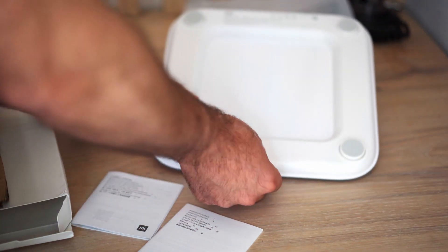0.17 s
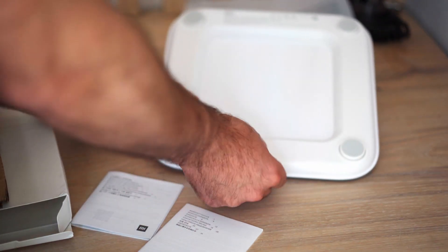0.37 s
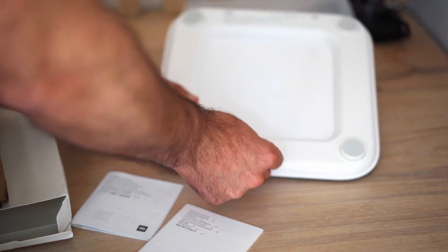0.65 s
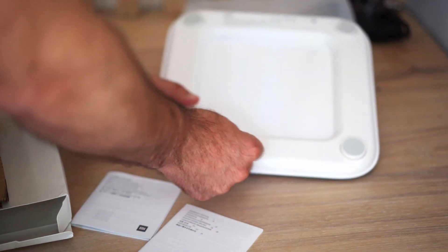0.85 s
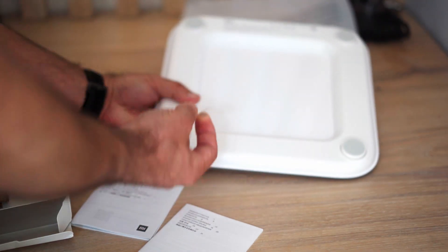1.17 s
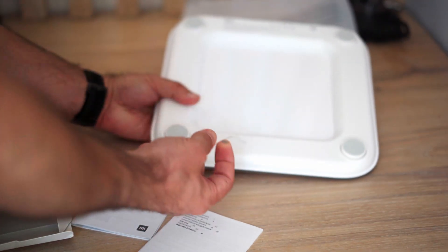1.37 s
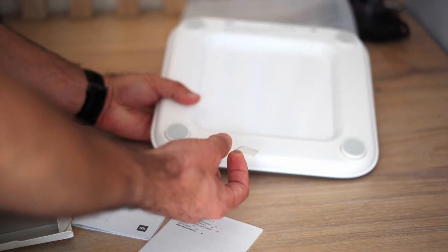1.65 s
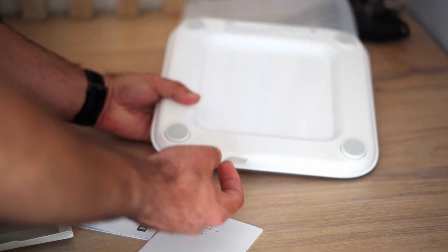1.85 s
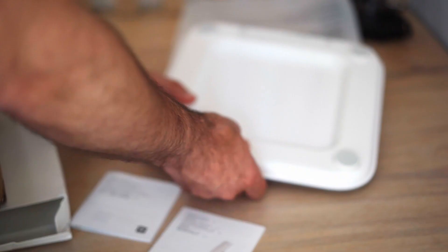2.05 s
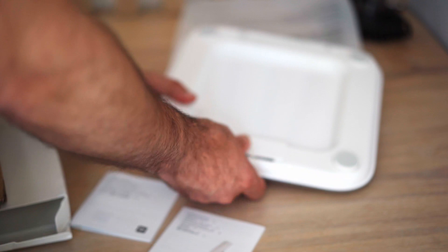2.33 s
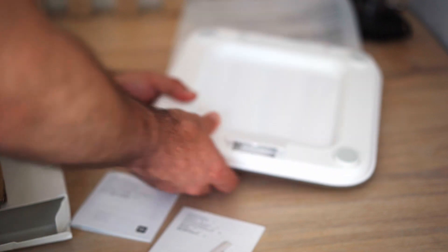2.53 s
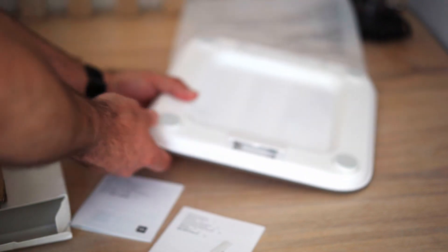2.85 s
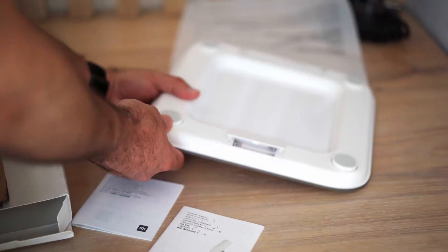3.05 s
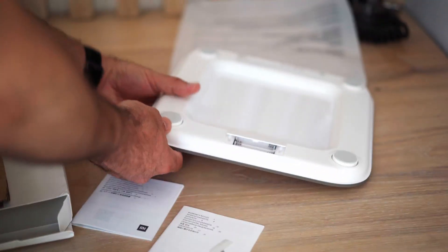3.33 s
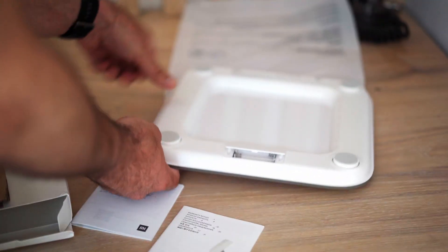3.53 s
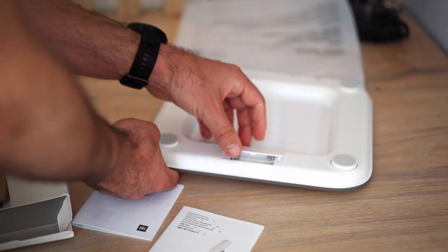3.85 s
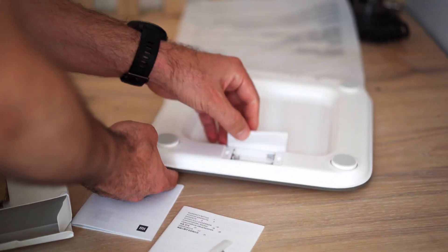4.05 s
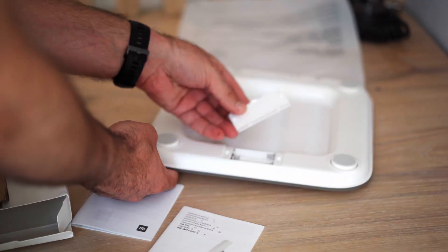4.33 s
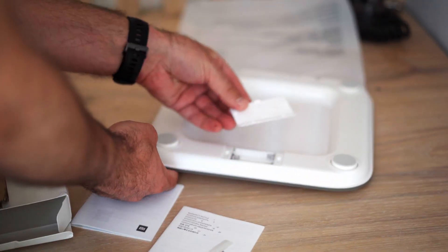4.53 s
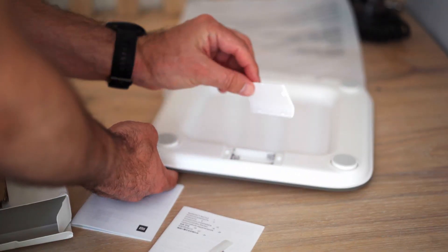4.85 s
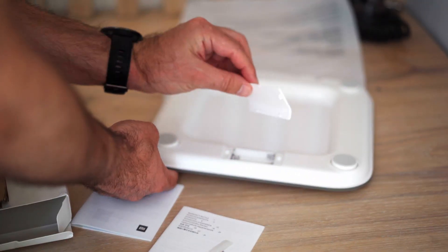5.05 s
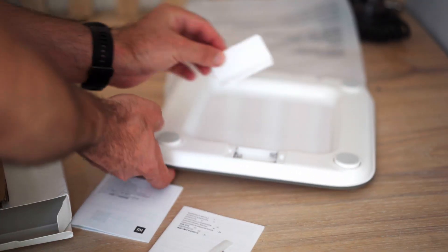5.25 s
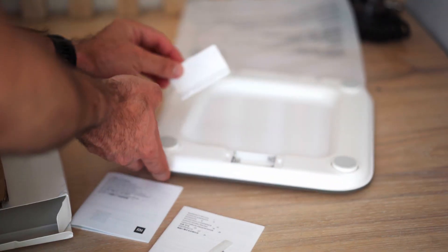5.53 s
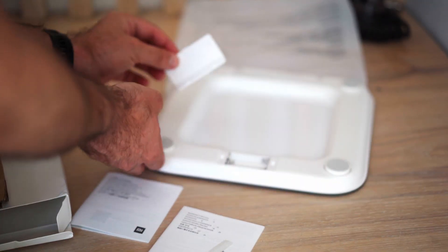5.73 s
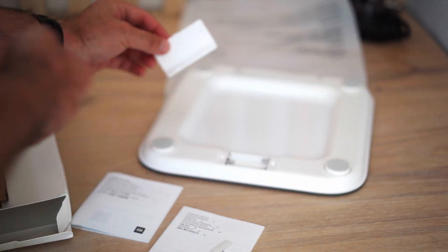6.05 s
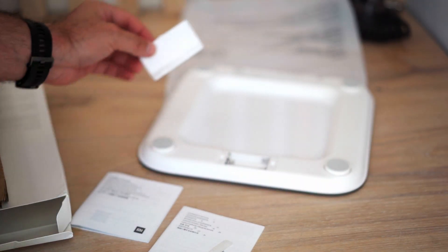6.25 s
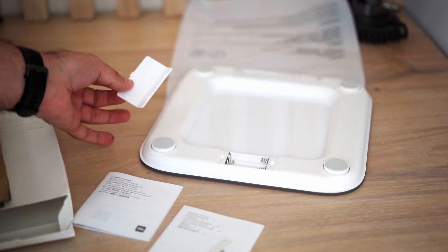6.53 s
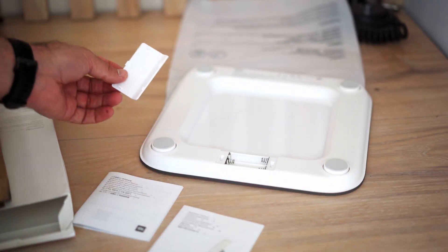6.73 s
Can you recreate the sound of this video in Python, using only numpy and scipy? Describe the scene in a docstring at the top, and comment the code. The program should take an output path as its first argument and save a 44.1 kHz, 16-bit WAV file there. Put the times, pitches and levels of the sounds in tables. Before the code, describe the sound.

Soft skin friction and tiny ticks on a plastic shell open the scene, over steady room noise. A small lid pops loose with a crisp snap and clatters lightly. Two clusters of hollow knocks with woody thumps follow, then rubbing, finger ticks and a light lid click. After a near-silent pause, the shell is put down sharply, and faint sliding ends it. Close microphone, short live room echo.

```python
"""Hands at work on a bathroom scale

Hands work on an upturned plastic bathroom scale on a wooden table, close to a camera in a bare room.
The battery lid snaps open and rattles on the wood; the scale knocks the table and ticks under the fingers,
the lid is picked up and the scale set down. Each contact is a burst of tiny impacts ringing resonances.
Skin slides on plastic as shaped noise with one soft squeak; the room is steady noise with a faint hum."""
import sys
import numpy as np
from scipy import signal
from scipy.fft import rfft, irfft, next_fast_len
from scipy.io import wavfile
from scipy.ndimage import uniform_filter1d

SR = 44100
rng = np.random.default_rng(int(sys.argv[2]) if len(sys.argv) > 2 else 0)


def waveform_to_disk(signal):
    """Save audio, clipped to [-1, 1], as 16-bit WAV at the path in sys.argv[1]."""
    frames = np.transpose(np.atleast_2d(signal))
    scaled = np.clip(frames, -1, 1) * 32767
    samples = np.round(scaled).astype(np.int16)
    wavfile.write(sys.argv[1], SR, samples)


N = 303849
SPAN = 2 ** 15  # samples for one contact and its echo
HZ = np.fft.rfftfreq(SPAN, 1 / SR)
T = np.arange(SPAN) / SR

# how wide the room's echo and the sliding skin sound: f/Hz, side minus mid level/dB
ROOM_WIDTH = [(30, -50), (110, -40.5), (200, -26.5), (400, -17.5), (700, -7), (1300, -4.5), (2400, 0.5),
              (8000, -0.5)]


def amp(db):
    """Turn decibels into a plain gain."""
    return 10 ** (np.asarray(db) / 20)


def unit(x):
    """Scale a signal to an average (rms) strength of 1."""
    return x / np.sqrt(np.mean(x ** 2) + 1e-20)


def along(points, hz):
    """Read a table of (frequency, value) points, joined by lines on a log frequency axis."""
    f, v = np.transpose(points)
    return np.interp(np.log(hz + 1), np.log(f + 1), v)


def curve(rows, order):
    """Read one column of a time table at every sample."""
    rows = np.array(rows)
    return np.interp(np.arange(N) / SR, rows[:, 0], rows[:, order])


def filtered(x, response):
    """Multiply the spectrum of x by a response that depends on frequency."""
    m = next_fast_len(N + SR // 2)
    spectrum = rfft(x, m) * response(np.fft.rfftfreq(m, 1 / SR))
    return irfft(spectrum, m)[..., :N]


def spread(side_table, hz):
    """Gains for mid and side: sound from all around differs more between two close ports as side grows."""
    return np.array([np.ones_like(hz), amp(along(side_table, hz))])


def left_right(mid, side):
    """Turn mid and side into a left and a right channel."""
    return np.array([mid + side, mid - side])


def wide(colour, side_table, patchy_db):
    """Stereo noise of rms 1 whose strength varies in random patches of time and frequency."""
    z = signal.stft(rng.standard_normal((2, N)), nperseg=512)[2]
    field = rng.standard_normal(z.shape[1:])
    field = uniform_filter1d(field, size=6, axis=0)  # smooth over frequency
    field = uniform_filter1d(field, size=10, axis=1)  # smooth over time
    pair = signal.istft(z * amp(patchy_db * unit(field)), nperseg=512)[1][:, :N]
    mid, side = filtered(pair, lambda hz: colour(hz) * spread(side_table, hz))
    return unit(left_right(mid, side))


def air():
    """Room tone is coloured noise that drifts slowly; a steady and a wavering low tone make the hum."""
    # the low hum: f/Hz, width of its wavering part/Hz, level/dB before the two-part mix below
    hum_hz, width_hz, hum_db = (84, 5, -73)
    # colour of room tone and microphone hiss: f/Hz, relative level/dB
    tone_colour = [(12, -52.5), (20, -19), (53, -4.5), (84, -5.5), (114, -11.5), (160, -5), (351, -10),
                   (428, -13), (535, -13), (839, -13.5), (1080, -17.5), (1690, -21), (3140, -26.5),
                   (14300, -34), (16500, -43.5)]
    # slow drift of the room tone: t/s, level/dB
    tone_drift = [(0, -62.5), (.5, -64.5), (1.5, -65), (4.8, -64.5), (5.4, -63.5), (6.89, -64.5)]
    # how wide the room tone sounds: f/Hz, side minus mid level/dB
    tone_width = [(30, -43), (110, -21.5), (200, -15), (400, -8), (800, -4.5), (2000, 0), (8000, 0)]
    waver = unit(filtered(rng.standard_normal(N), lambda hz: 1 / (1 + (2 * (hz - hum_hz) / width_hz) ** 2)))
    steady = np.sin(2 * np.pi * hum_hz * np.arange(N) / SR)
    hum = 1.2 * steady + .35 * waver
    tone = wide(lambda hz: amp(along(tone_colour, hz)), tone_width, patchy_db=1.5)
    return amp(curve(tone_drift, order=1)) * tone + amp(hum_db) * hum


def skin():
    """Each slide swells, holds and fades; skin drags on middle tones, hisses above and once squeaks softly."""
    # skin sliding on plastic: start t/s, fastest t/s, end t/s, drag level/dB, hiss level/dB
    slides = [(0.125, 0.148, 0.2, -65.5, -88), (.25, 0.496, 0.94, -74.5, -76.5),
              (0.62, 0.687, 0.84, -66, -68.5), (0.789, 0.912, 0.98, -62, -61),
              (0.95, 0.988, 1.12, -68, -57.5), (1.05, 1.24, 1.43, -77, -73),
              (1.908, 2.054, 2.094, -89, -69), (3.319, 3.457, 3.88, -58, -65.5),
              (5.006, 5.232, 5.67, -68.5, -79), (5.556, 5.7, 5.78, -61, -63),
              (5.793, 6.3, 6.78, -65, -64.5), (6.72, 6.805, 7.1, -65, -73)]
    # colour of the drag on the shell: f/Hz, relative level/dB
    drag_colour = [(150, -82), (500, -5), (1200, 0.5), (2500, -4.5), (5000, -9.5), (9000, -31)]
    # colour of the hiss: f/Hz, relative level/dB
    hiss_colour = [(1470, -37), (2500, -2), (7260, 5), (14400, 0), (16000, 3), (16500, -22.5)]
    # a dragging fingertip: t/s, squeak f/Hz, gain on the wavering tone/dB
    squeak_path = [(.64, 1400, -80), (.68, 1250, -54.5), (.74, 1080, -57.5), (.82, 950, -67),
                   (.86, 900, -86)]
    press, curl = 1.27, 1.03  # how soon a slide reaches full pressure; how much its edges taper

    drag = wide(lambda hz: amp(along(drag_colour, hz)), ROOM_WIDTH, patchy_db=3)
    hiss = wide(lambda hz: amp(along(hiss_colour, hz)), ROOM_WIDTH, patchy_db=2.5)
    # slow noise makes the squeak waver
    flutter = wide(lambda hz: 1 / (1 + (hz / 180) ** 2), [(100, -6.5)], patchy_db=2.5)
    squeak = flutter * np.sin(2 * np.pi * np.cumsum(curve(squeak_path, order=1)) / SR)

    start, peak, end, drag_db, hiss_db = np.transpose(slides)
    t = np.arange(0, N + 64, 64)[:, None] / SR  # one step every 64 samples
    swell = (t - start) / (peak - start)
    fade = (end - t) / (end - peak)
    stroke = np.clip(press * np.minimum(swell, fade), 0, 1) ** curl
    drag_gain = np.interp(np.arange(N) / SR, t[:, 0], stroke @ amp(drag_db))
    hiss_gain = np.interp(np.arange(N) / SR, t[:, 0], stroke @ amp(hiss_db))
    rub = drag_gain * drag + hiss_gain * hiss
    rub = rub * amp([[-1.5], [1.5]])  # a little to the right
    return rub + amp(curve(squeak_path, order=2)) * squeak


def modes(table):
    """Response of a set of damped resonances, each ringing at its own pitch after it is struck."""
    total = 0
    for k, (centre, width, db) in enumerate(table):
        ring = 1j * HZ * width / (centre * centre - HZ * HZ + 1j * HZ * width)
        total = total + (-1) ** k * amp(db) * ring
    return total


def detuned(table, pitch_spread, level_spread_db=0):
    """Shift each resonance a little at random, in pitch and in level."""
    return [(hz * rng.normal(1, pitch_spread), width, db + rng.normal(0, level_spread_db))
            for hz, width, db in table]


def above(hz):
    """A small plate radiates little bass."""
    return (1j * HZ / (hz + 1j * HZ)) ** 2


def hard(db_octave, corner_hz, steep):
    """A longer contact passes less treble; a harder one tilts the spectrum up."""
    return (1 + 1j * HZ / 500) ** (db_octave / 6) / (1 + 1j * HZ / corner_hz) ** steep


def room():
    """A fresh stereo echo tail: a gap until the first wall, then each frequency dies at its own speed."""
    # echo times: f/Hz, time to fall by 60 dB/s
    echo_time = [(60, 0.85), (300, 0.57), (850, 0.75), (2600, 0.6), (8000, 0.56), (16000, 0.34)]
    hz, t, z = signal.stft(rng.standard_normal((2, SPAN)), SR, nperseg=256)
    dying = z * amp(-60 * t / along(echo_time, hz)[:, None])
    tail = signal.istft(dying, SR, nperseg=256)[1][:, :SPAN]
    tail = tail * (1 - np.exp(-(T / 0.0013) ** 2)) * (T < .6)
    spectrum = rfft(tail / np.linalg.norm(tail[0])) * spread(ROOM_WIDTH, HZ)
    mid, side = spectrum / (1 + 1j * HZ / 10000)  # soft things swallow treble
    return left_right(mid, side)


def add(out, s, db, pan_db, chatter, body, wet_db, blow, push=0):
    """One contact: a first blow and a dying volley of tiny impacts ring the body; one soft push moves the table."""
    t = T[:SPAN // 4]
    impacts = rng.standard_normal(SPAN // 4) * amp(3.9 * rng.standard_normal(SPAN // 4))
    rise = 1 - np.exp(-t / min(.0008, chatter / 4))
    volley = impacts * np.exp(-t / chatter) * rise
    volley[0] = blow * np.linalg.norm(volley)
    strength = np.linalg.norm(volley)

    whole = strength * (body + push)  # the walls blur the volley into one blow
    gain = amp(db) / np.sqrt(np.sum(irfft(whole) ** 2) / (chatter * SR + 60))
    sound = rfft(volley, SPAN) * body + strength * push

    shadow = HZ ** 2 / (HZ ** 2 + 700 ** 2)  # the camera body shades only short waves
    lead = np.exp(2j * np.pi * HZ * 3e-6 * pan_db * np.array([[.5], [-.5]]))  # the nearer port hears first
    direct = sound * amp(np.outer([.5, -.5], pan_db * shadow)) * lead
    late = np.exp(-2j * np.pi * HZ * .7 * chatter)  # delays the echo to within the volley
    echo = amp(wet_db) * whole * late * room()

    start = round(s * SR)
    piece = out[:, start:start + SPAN]
    piece += gain * irfft(direct + echo)[:, :piece.shape[1]]


def ticks():
    """Nail and plastic ticks: short volleys through one broad, quickly damped resonance."""
    # each tick: t/s, level/dB before stereo and echo, chatter fading time/s, centre f/Hz
    tick_list = [(.141, -67, 0.01, 3500), (0.907, -52.5, 0.0017, 9100), (.935, -51.5, .0018, 19000),
                 (.970, -59, 0.0088, 21000), (.978, -44, 0.017, 20000), (1.005, -51.5, .004, 1500),
                 (1.008, -54.5, .003, 7000), (2.864, -50.5, 0.026, 5300), (3.078, -43, .004, 7800),
                 (3.095, -38, 0.017, 2830), (3.393, -56.5, .004, 5760), (3.473, -56.5, 0.0012, 3507),
                 (3.504, -42, 0.0014, 7360), (3.510, -45, .0015, 7000), (3.519, -40, 0.0019, 2500),
                 (3.542, -50.5, 0.0029, 3000), (3.592, -48.5, 0.00076, 2800), (3.605, -50, 0.0012, 5440),
                 (3.672, -46.5, 0.0011, 2630), (3.695, -52.5, 0.0018, 2400), (3.868, -62.5, 0.0046, 1960),
                 (4.135, -61, .004, 1790), (4.867, -65.5, 0.00212, 1990), (5.19, -67, .004, 2470),
                 (5.548, -50.5, 0.0015, 2040), (5.596, -35, 0.00088, 2580), (5.644, -54, 0.0048, 2600),
                 (5.667, -61, .0022, 2200), (5.687, -50, .001, 3500), (5.700, -49, .001, 4000),
                 (5.723, -49, 0.011, 4860), (6.754, -65, 0.0042, 3000)]
    out = np.zeros((2, N))
    for s, db, chatter, hz in tick_list:
        body = modes([(hz, 1.7 * hz, 0)]) ** 2 * above(300)
        blow = 0.49 * np.exp(-chatter / 0.0065)  # a long scuff starts softly
        add(out, s, db, -6.5, chatter, body, wet_db=-5, blow=blow)  # hands a little to the right
    return out


def knocks():
    """The shell rings anew at each blow; the spot it lands on sets how much each table mode thumps."""
    # the scale knocks the table: t/s, level/dB before stereo and echo, left minus right/dB (treble),
    # chatter fading time/s, hardness tilt/dB per octave, relative table thump/dB, spot across the table (0-1)
    knock_list = [(.398, -60.5, -1.5, .012, -5.5, 2, 0.08), (2.886, -21.5, -5.5, 0.007, 0, 1.5, 0.26),
                  (2.930, -30.5, -3, .014, 1, 7.5, 0.32), (2.949, -34, -7, .011, -7, -4, 0.26),
                  (3.105, -20, -5, 0.01, -2, 1.5, 0.49), (3.122, -26, -1, 0.0067, -11, -9, 0.4),
                  (3.190, -29, -7, .01, 0, -10, 0.5), (3.205, -29, -3, 0.0091, -4, 16, 0.45),
                  (3.363, -43.5, 2, 0.011, 0, 15, .48), (3.528, -51.5, -1, 0.014, 2, 16.5, 0.16),
                  (5.737, -17.5, -7.5, .003, -2.5, -17.5, 0), (5.7426, -17.5, -7, 0.0019, -2, -25, 0),
                  (5.749, -27.5, 3, 0.0092, -2.5, 13, 0.46), (5.762, -28, 1, 0.00837, -7.5, 3, 0.28),
                  (5.780, -26.5, 1.5, .003, -7, -13, 0.29), (5.810, -31.5, -6.5, 0.005, -5, -8, 0.32)]
    # resonances of the wooden table: f/Hz, width/Hz, relative level/dB
    table_modes = [(69.4, 10, 0), (145.3, 26, 0), (378, 32.6, 2.5), (653, 51, -2)]
    # resonances of the plastic shell before random shifts: f/Hz, width/Hz, relative level/dB
    shell_modes = [(475, 72, -4), (744, 91.6, 3.5), (1036, 24, 3), (1264.4, 79, 9.5), (1530, 70, 0),
                   (1820, 142, 5), (2160, 600, -2), (2635, 280, 7.5), (3580, 97, -2.5), (3740, 770, -8.5)]
    out = np.zeros((2, N))
    for s, db, pan_db, chatter, hard_db, thump_db, spot in knock_list:
        ringing = modes(detuned(shell_modes, 0.02, 2.2))
        shell = ringing + amp(-2.0) * above(340)  # plus an unpitched part
        body = hard(hard_db, 3500, steep=2.61) * shell

        shape = np.abs(np.cos(np.pi * spot * np.arange(1, len(table_modes) + 1)))
        thump = 0
        for k, row in enumerate(table_modes):
            thump = thump + (-1) ** k * shape[k] * modes([row])
        push = amp(9.0 + thump_db) * thump * above(25) * hard(0, 1200, steep=1.7)
        add(out, s, db, pan_db, chatter, body, wet_db=-2.5, blow=0.42, push=push)
    return out


def lid():
    """The thin lid rings with other modes when seated, loose, slid or held, a little detuned each time."""
    # lid contacts: t/s, how the lid lies, level/dB before stereo and echo, left minus right/dB (treble),
    # chatter fading time/s, hardness tilt/dB per octave, first blow share (0-1)
    contacts = [(2.187, "seated", -15, -7, 0.0019, -2, 0.5), (2.192, "seated", -22, -8, 0.0039, -0.5, .3),
                (2.450, "loose", -33.5, -6.5, 0.0057, 0, 0.2),
                (2.458, "loose", -33.5, -7.5, 0.0062, 1, 0.1),
                (2.470, "loose", -34.5, -5.5, .011, 2.5, 0.3), (2.476, "loose", -42, -3, .005, 2, .3),
                (2.484, "loose", -39.5, -2.5, .0033, 1.5, .22), (3.949, "slid", -44, -5, .012, -2, 0.13),
                (3.957, "slid", -40, -12.5, .0052, -1, 0.17), (4.117, "held", -55, -9, 0.015, -3.5, .4),
                (4.145, "held", -29, -7, 0.0046, 1.8, 0.67), (4.199, "held", -48, -7, 0.0099, -4.5, 0.1),
                (4.208, "held", -44, -10.5, 0.0064, -2.5, 0.3)]
    # unpitched part for each way the lid lies: relative level/dB
    thud_db = {"seated": -12, "loose": -18, "slid": -13, "held": -15}
    # lid resonances before random shifts, for each way it lies: f/Hz, width/Hz, relative level/dB
    lid_modes = {
        "seated": [(397, 50, -10), (613, 110, 1.5), (1212, 160, -1), (1902, 210, 5), (2690, 320, -21.5),
                   (4200, 600, -31.5), (6880, 530, -18.5), (9700, 820, -3.5), (14800, 2700, -15.5)],
        "loose": [(1237, 210, 0), (2100, 146, 2), (3030, 460, -14.5), (4180, 80, 0.5), (4520, 140, -3.5),
                  (4880, 160, -8.5), (5020, 80, -7), (5850, 110, -3.5), (6300, 89, -8), (7770, 150, -1.5),
                  (8580, 300, -14), (9600, 250, -6.5), (10650, 520, -14)],
        "slid": [(1480, 170, -3), (2270, 170, 2), (3150, 145, 1.5), (4410, 150, 2), (5820, 150, -0.5)],
        "held": [(910, 290, -7), (1965, 110, 3), (3150, 110, -6), (3510, 120, -2), (5260, 1300, -11.5),
                 (7100, 1100, -2.5), (10400, 2700, -11)],
    }
    out = np.zeros((2, N))
    for s, state, db, pan_db, chatter, hard_db, blow in contacts:
        ringing = modes(detuned(lid_modes[state], .012))
        plate = (ringing + amp(thud_db[state])) * above(650)
        body = hard(hard_db, 6000, steep=1.75) * plate
        add(out, s, db, pan_db, chatter, body, wet_db=-4.0, blow=blow)
    return out


def scene():
    """All layers together, in stereo."""
    return air() + skin() + ticks() + knocks() + lid()


def record(dry):
    """The camera keeps nothing from its band limit of 16150 Hz upwards."""
    return filtered(dry, lambda hz: hz < 16150)


dry = scene()
out = record(dry)
waveform_to_disk(out)
```